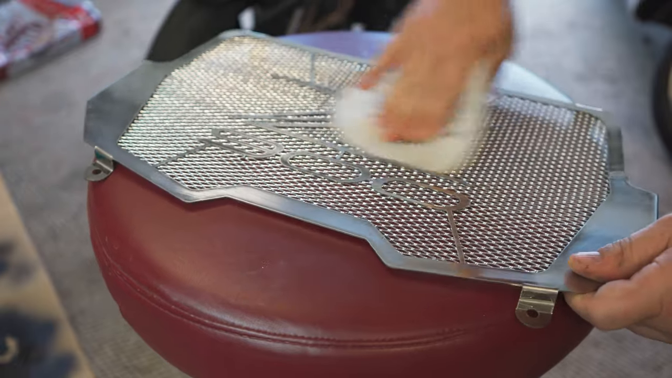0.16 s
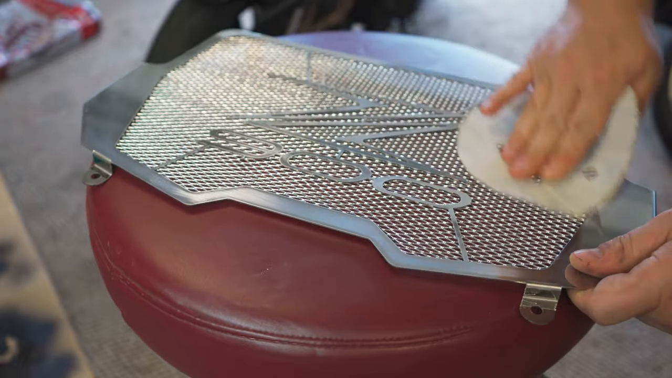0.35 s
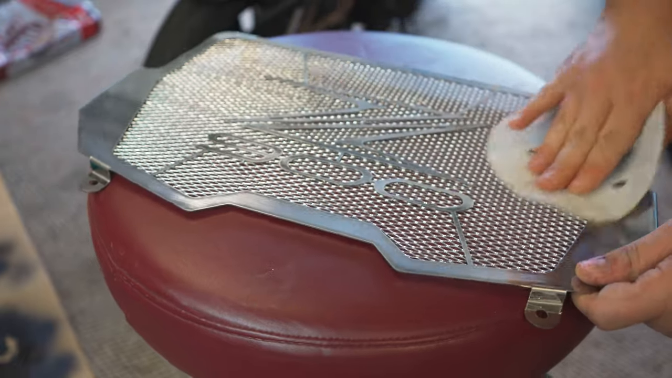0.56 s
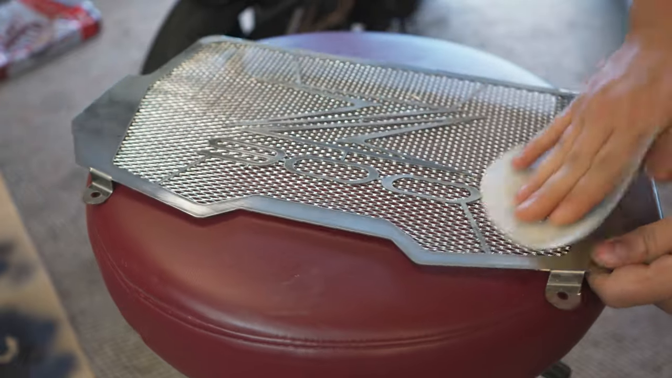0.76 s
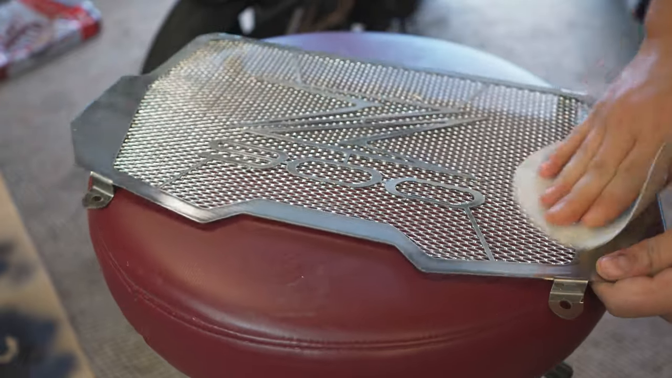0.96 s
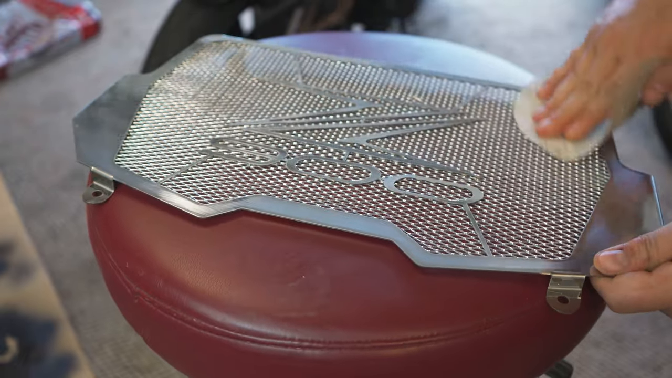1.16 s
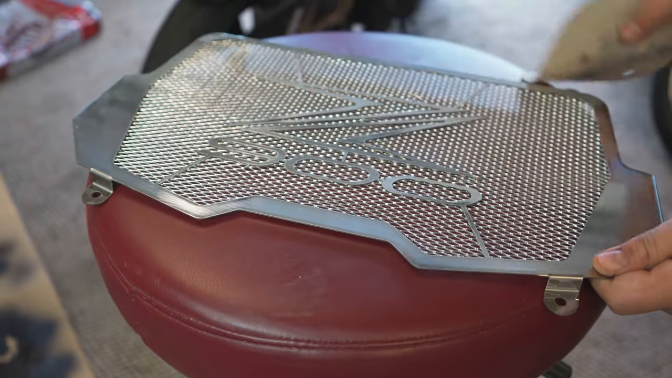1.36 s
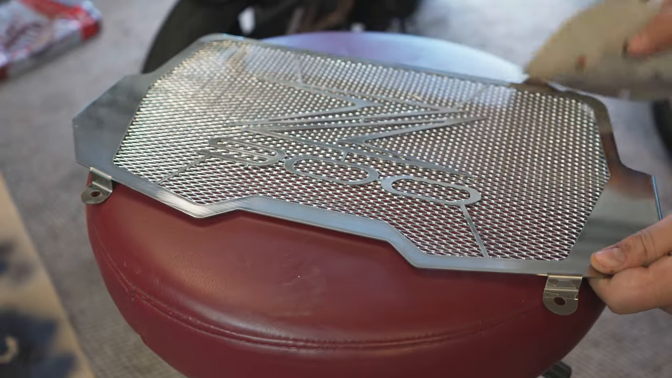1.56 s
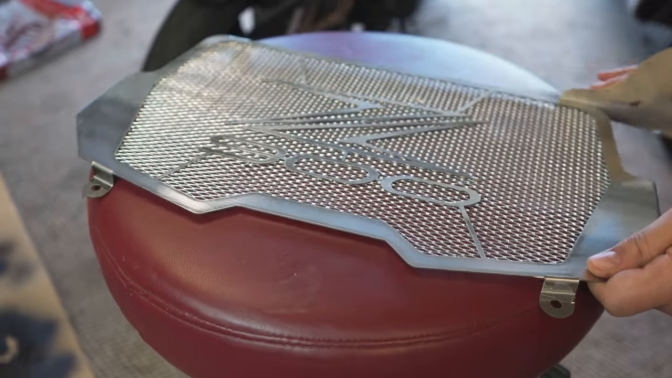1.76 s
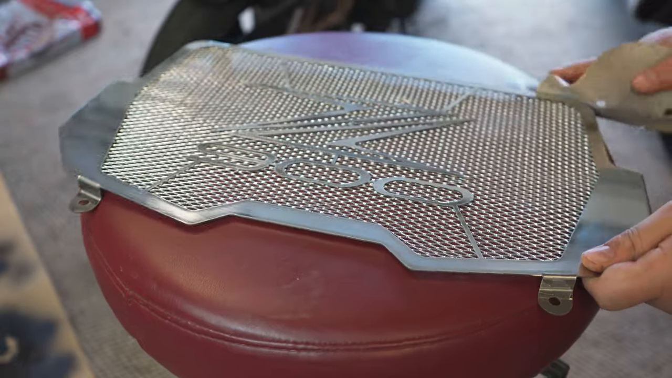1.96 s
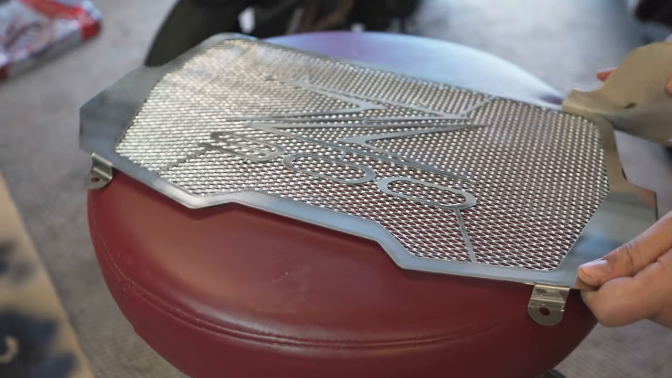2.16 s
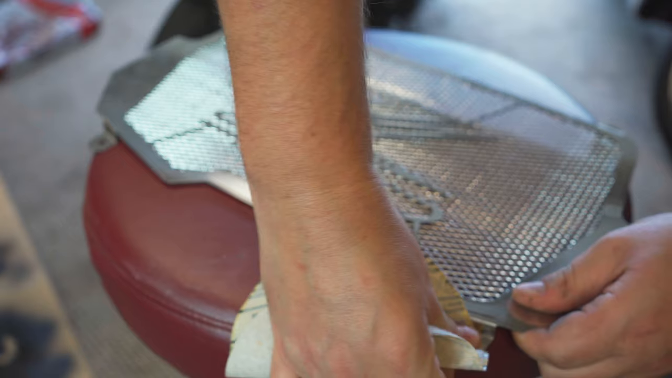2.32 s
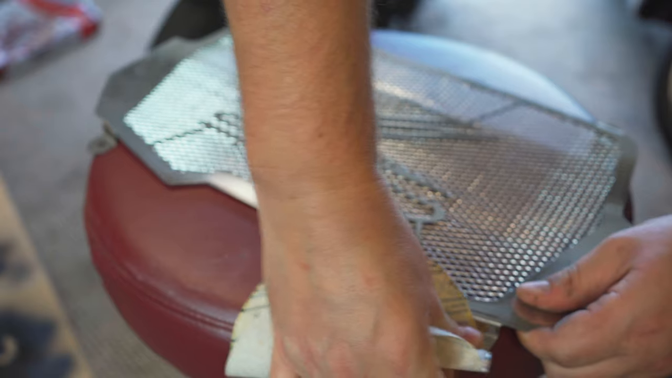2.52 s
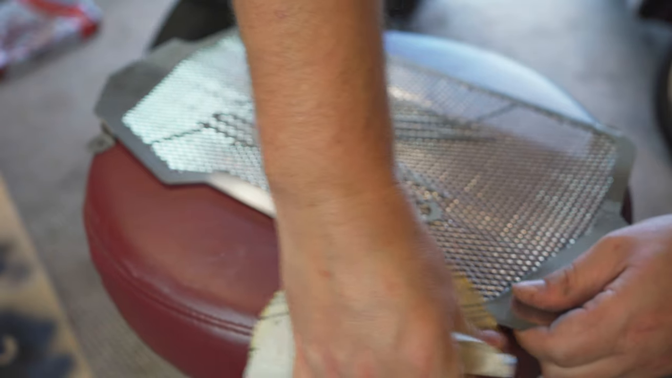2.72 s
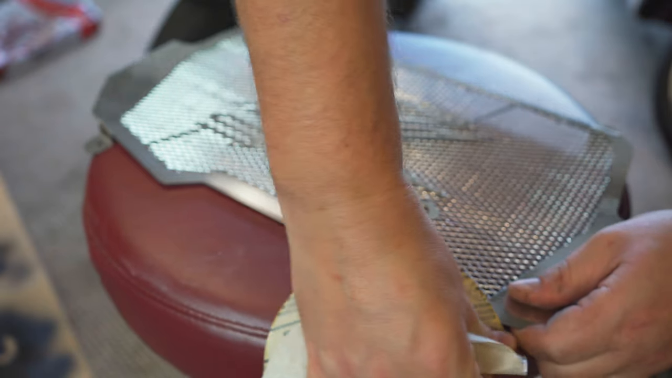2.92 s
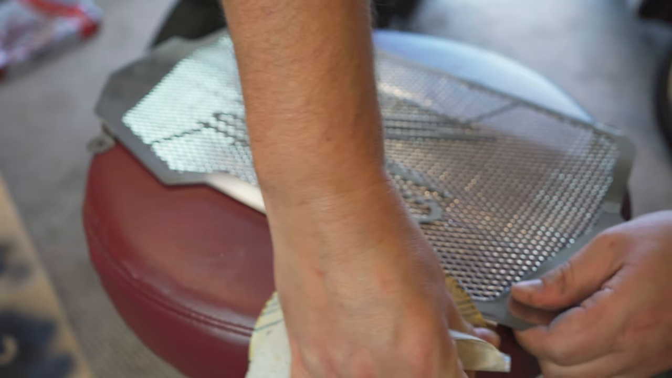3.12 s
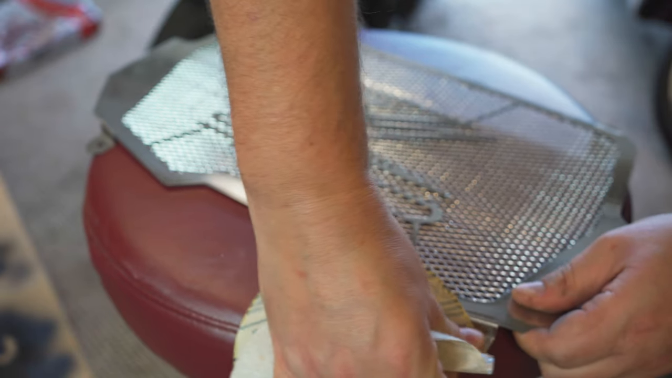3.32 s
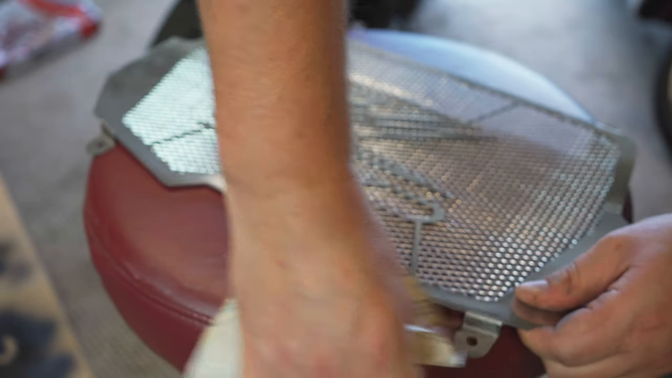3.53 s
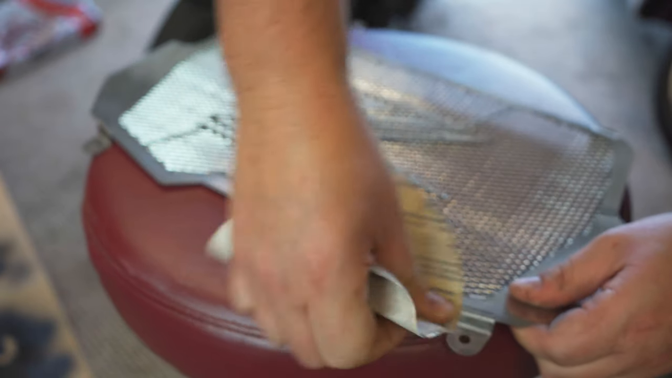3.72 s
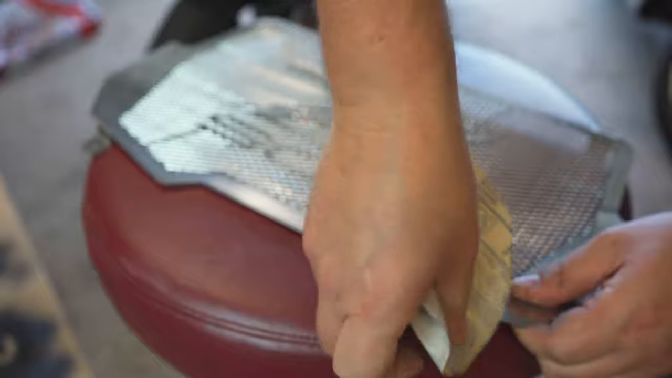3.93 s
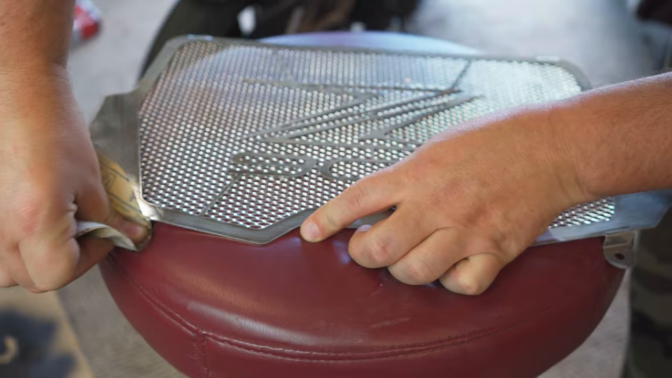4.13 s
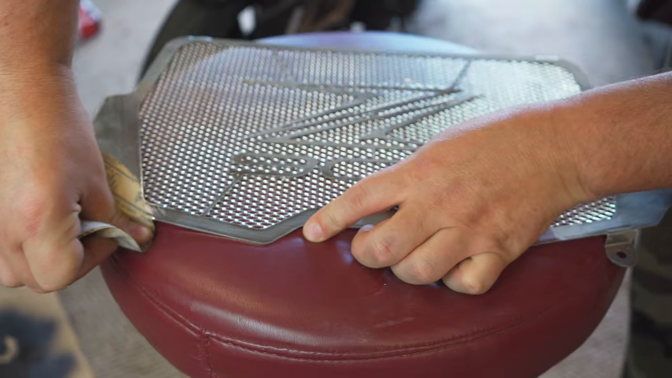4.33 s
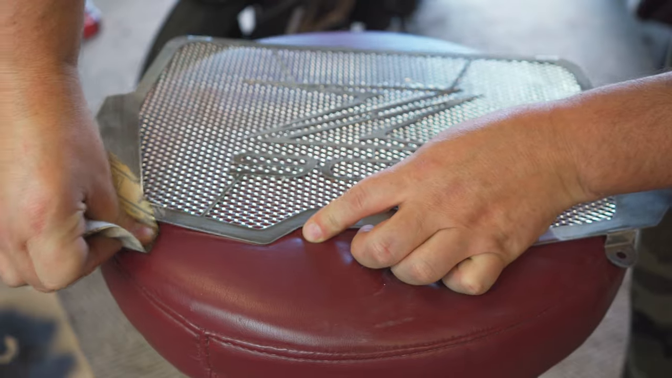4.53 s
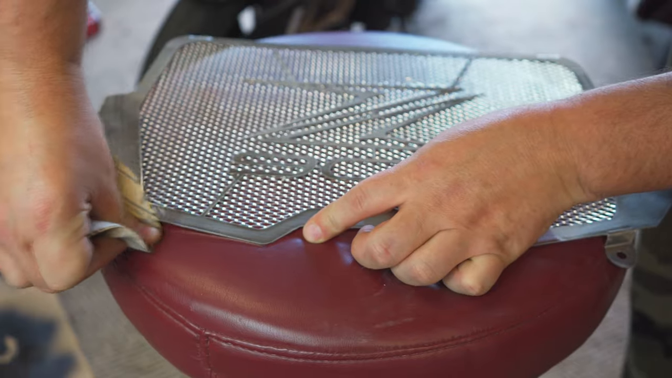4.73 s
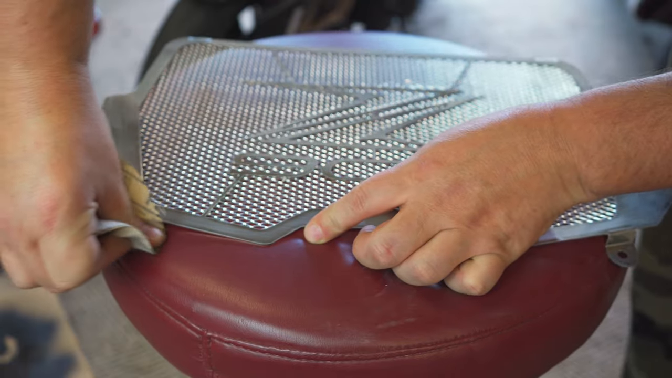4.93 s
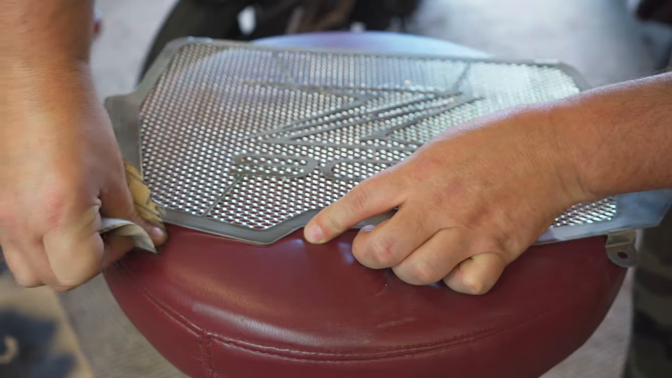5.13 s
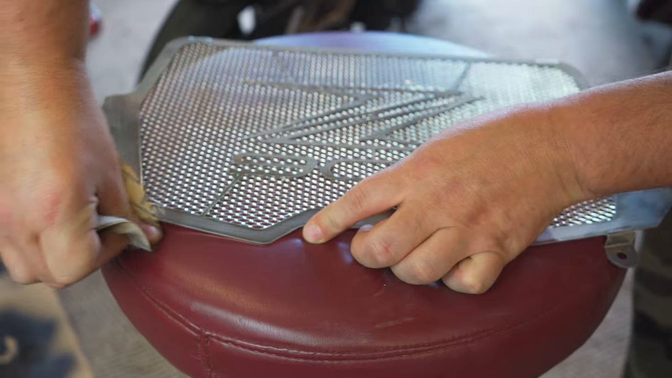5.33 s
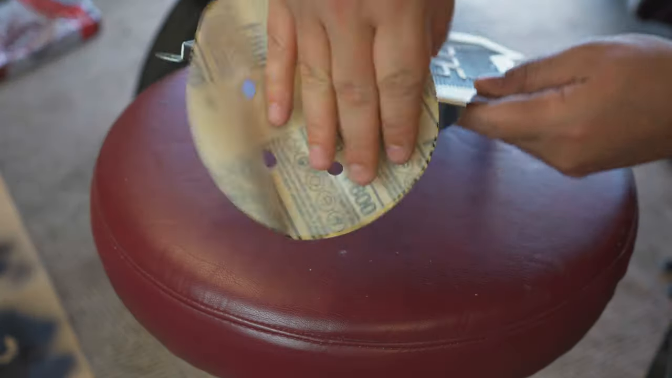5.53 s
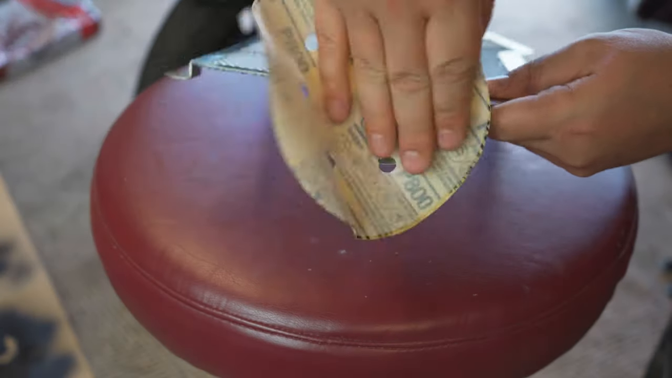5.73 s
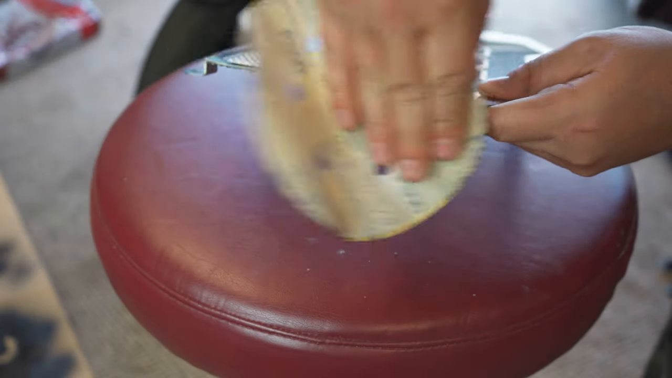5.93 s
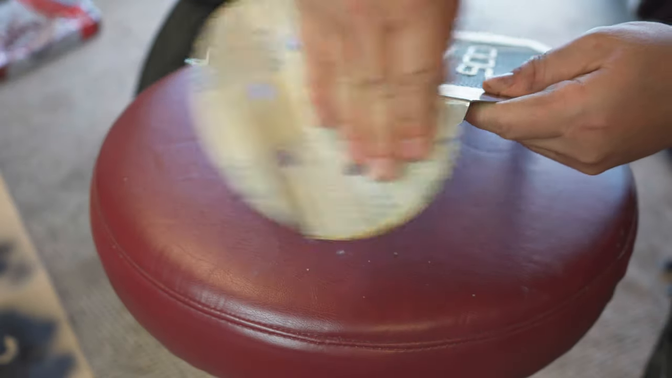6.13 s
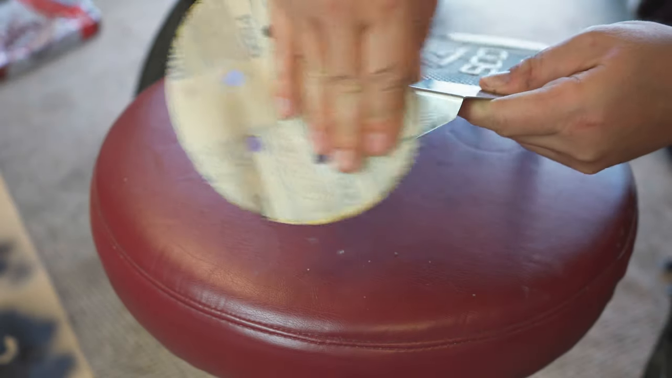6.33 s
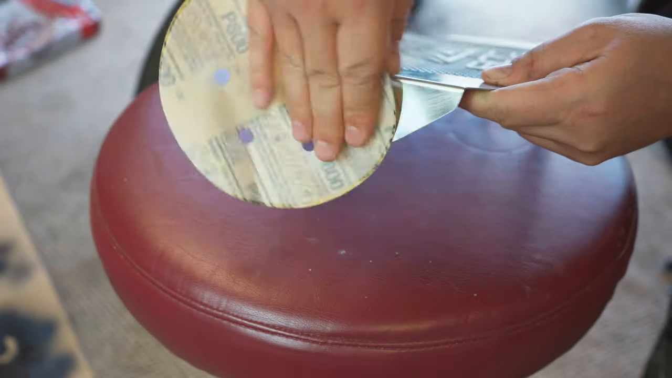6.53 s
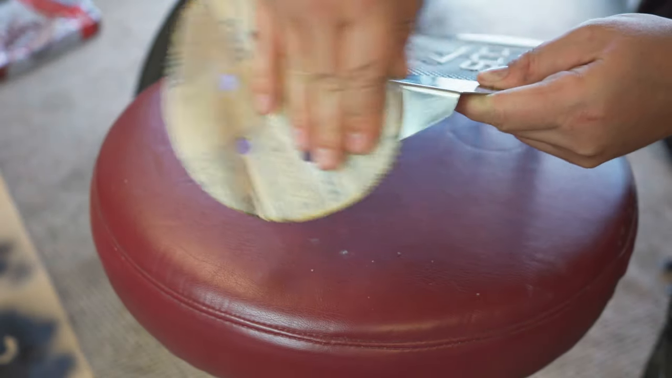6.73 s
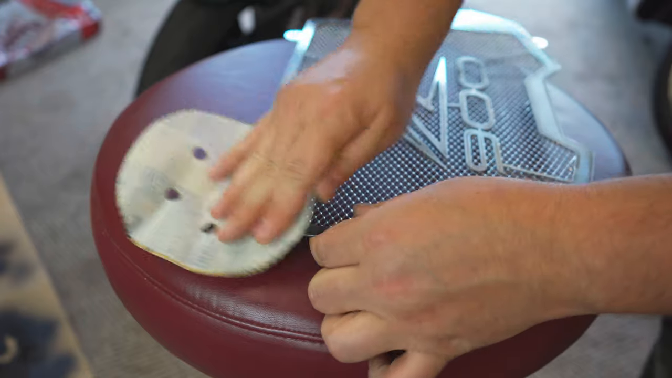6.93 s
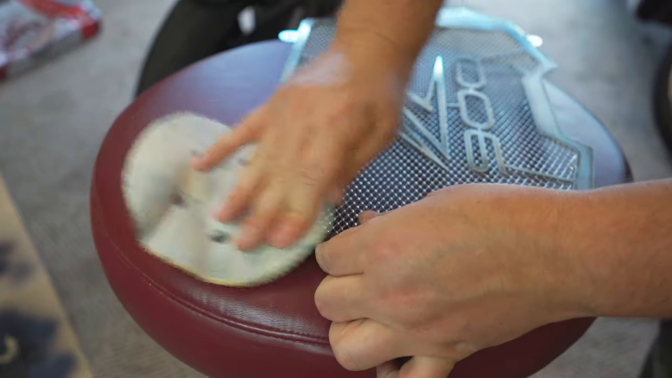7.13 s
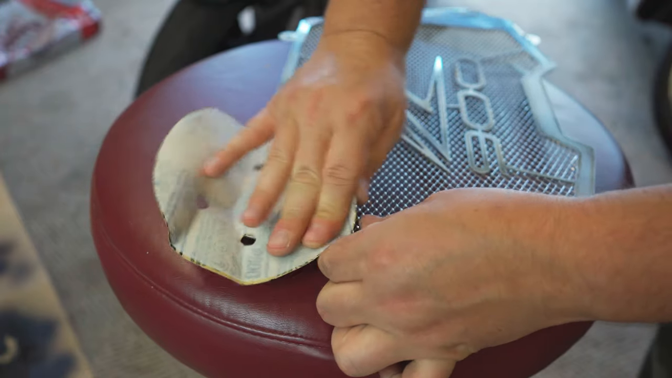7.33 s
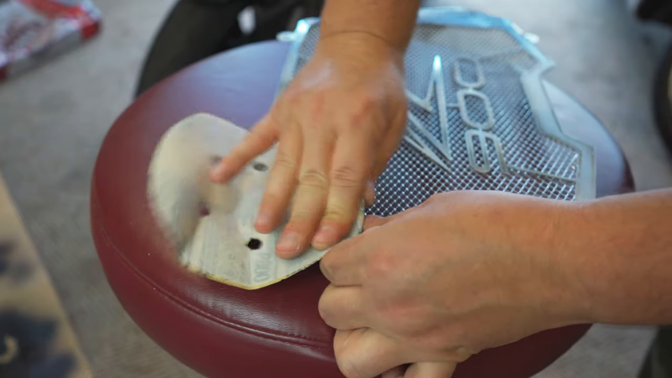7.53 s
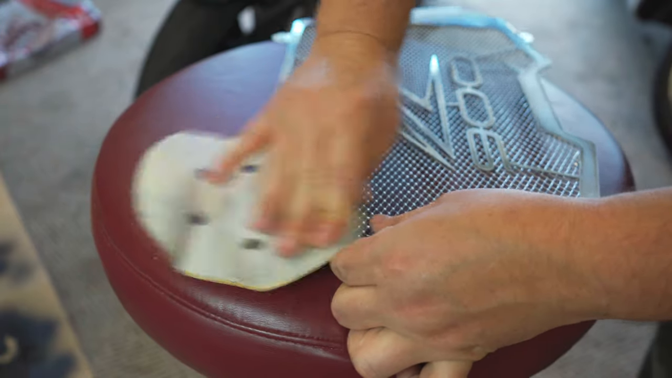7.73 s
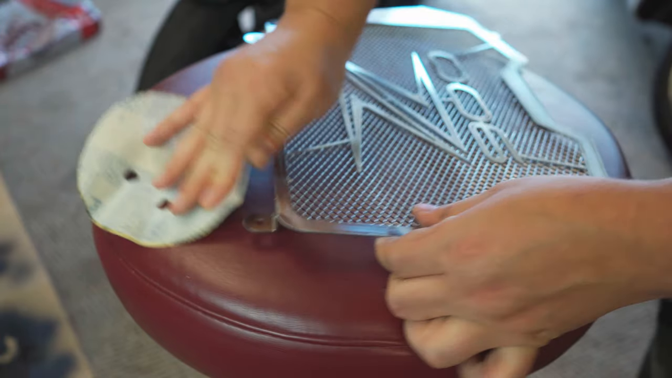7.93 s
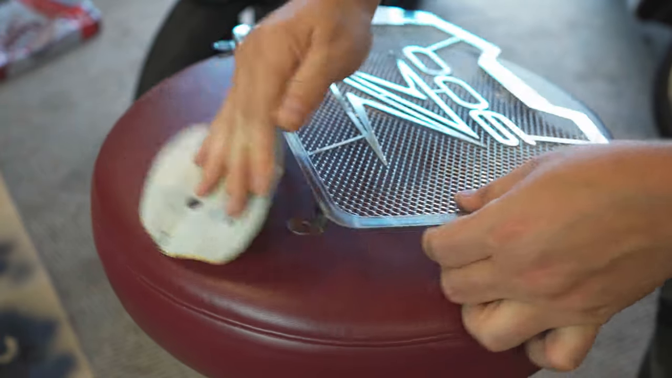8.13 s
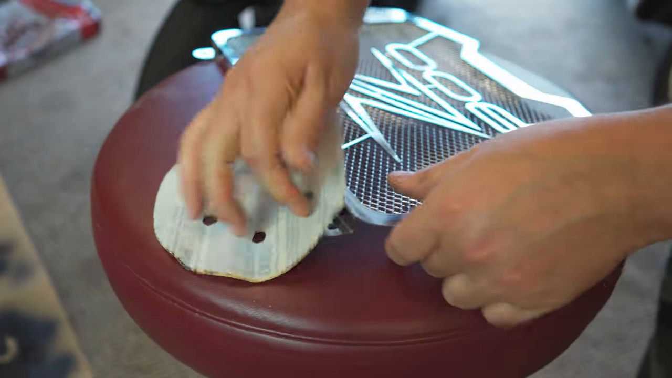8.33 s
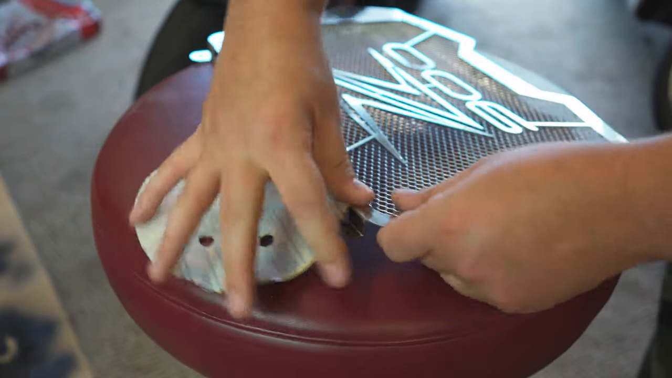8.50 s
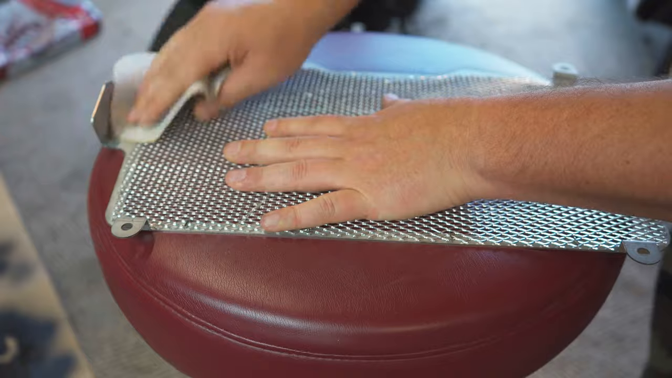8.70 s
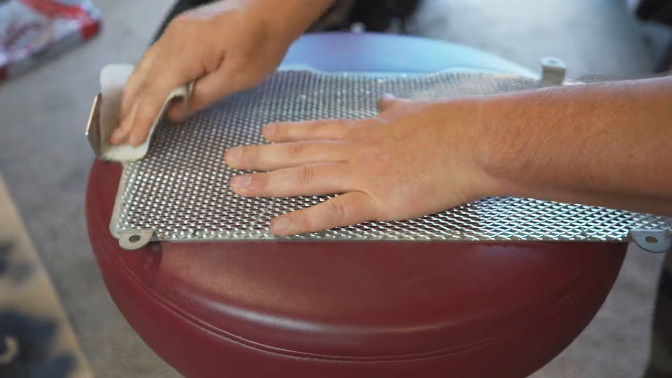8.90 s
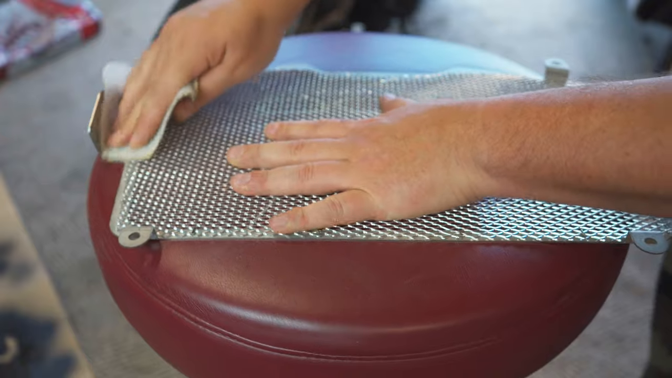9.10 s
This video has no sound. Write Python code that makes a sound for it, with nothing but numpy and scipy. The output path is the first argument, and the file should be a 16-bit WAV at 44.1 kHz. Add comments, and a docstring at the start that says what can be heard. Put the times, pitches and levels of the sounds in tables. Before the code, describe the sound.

A sandpaper disc is rubbed by hand over a perforated steel sheet on a padded stool. Broad hissy scuffs come first, then sparser handling, then fast, even, scratchy strokes in several bouts, each with its own tone. Ticks, dull knocks and soft cushion thuds mark the shifts, and tiny squeaks come near the end. Close stereo pickup in a workshop with a short reverberation and a faint low rumble.

```python
"""In a workshop, a sanding disc is rubbed by hand, in quick strokes, over a steel mesh grille on a padded stool.
Strokes, and faint rustles as the disc lifts off or is handled, are noise with snaps of single grains,
coloured by each grip, plus rim chatter and a flexing sheet. Decaying noise bursts make ticks, dull knocks and
bright crackles; low noise swells make the shoves into the cushion; gliding sines make late squeaks.
A diffuse tail answers the work, over filtered noises: low rumble, deep drone, soft air, thin steady high hiss."""
import sys
import numpy as np
from scipy import signal
from scipy.fft import rfft, irfft, next_fast_len
from scipy.io import wavfile
from scipy.ndimage import uniform_filter1d, map_coordinates

SR = 44100
rng = np.random.default_rng(int(sys.argv[2]) if len(sys.argv) > 2 else 0)


def generate_wav(signal):
    """Clip the signal to [-1, 1] and save it as 16-bit WAV at the path in sys.argv[1]."""
    frames = np.transpose(np.atleast_2d(signal))
    scaled = np.clip(frames, -1, 1) * 32767
    pcm = np.round(scaled).astype(np.int16)
    wavfile.write(sys.argv[1], SR, pcm)


N = 403956  # length in samples

# Share of a stroke or rustle after which it surges most
AT_ONCE, EARLY, MID, LATE = 0.12, 0.16, 0.48, 0.79

# Spectral shape of the rasp for each way of holding the work: f/Hz, relative density/dB
FLAT_ON_MESH = [(820, -34), (1400, -10.5), (1930, -2.5), (3040, -4.5), (3530, -2), (8820, 0.5), (12400, -5),
                (14400, -4.5), (15500, -9)]
FAR_CORNER = [(820, -40), (1400, -7), (1660, -3), (1800, -2), (4830, -3), (7000, -9), (9370, -10.5),
              (15500, -19)]
NEAR_RIM = [(820, -49), (1400, -11), (2070, -5.5), (3260, -1), (4190, -6), (4870, -4), (5730, -10),
            (9370, -11), (15500, -18.5)]
SIDE_TAB = [(820, -40), (1400, -8.5), (1860, -4), (2220, -8), (2720, -4.5), (3680, -7.5), (4190, -2.5),
            (4920, -7.5), (5390, -3.5), (9370, -13), (15500, -17)]
UPRIGHT_EDGE = [(820, -26.5), (1400, -9), (1870, -1.5), (2890, -1), (3460, -2), (3790, -2.5), (7220, -3),
                (11300, -5), (15500, -9.5)]
END_RIM = [(820, -31), (1400, -18), (1580, -8.5), (2390, -8.5), (2690, -12), (3160, -0.5), (3790, -8.5),
           (5070, -3), (7000, -5.5), (12500, -7.5), (15500, -11.5)]
BRACKET = [(820, -42), (1400, -10), (2430, 0.5), (3640, -3.5), (4190, 1), (4780, -3.5), (8480, -8),
           (10900, -12), (15500, -14.5)]

# Spectral shape of the low rumble, also of the cushion's swells: f/Hz, relative density/dB
RUMBLE_COLOUR = [(25, -24), (50, -20), (70, -9), (97, 3), (112, -5), (130, 1.5), (175, -5.5), (220, -5.5),
                 (300, -15), (500, -34.5)]


def amp(db):
    """Level as the logarithm of amplitude: decibels to gain."""
    return 10 ** (np.asarray(db) / 20)


def unit(x):
    """Normalisation by mean power: x at rms 1."""
    return x / np.sqrt(np.mean(x ** 2) + 1e-20)


def along(points, hz):
    """Logarithmic frequency scale: interpolate (f/Hz, value) points along it."""
    f, v = np.transpose(points)
    return np.interp(np.log(hz + 1), np.log(f + 1), v)


def wobble(rate, size):
    """Band-limited random modulation: a smooth curve through rate random knots a second."""
    knots = rng.standard_normal(int(size * rate / SR) + 4)
    return map_coordinates(knots, [np.arange(size) * rate / SR], mode="nearest")


def filtered(x, response):
    """Linear filtering: the spectrum of x times a complex response of frequency."""
    n = x.shape[-1]
    m = next_fast_len(n + 4096)
    return irfft(rfft(x, m) * response(np.fft.rfftfreq(m, 1 / SR)), m)[..., :n]


def add(track, s, sound):
    """Superposition: mix a sound into the track from time s."""
    at = round(s * SR)
    part = sound[:, max(-at, 0):max(N - at, 0)]
    start = max(at, 0)
    track[:, start:start + part.shape[1]] += part


def spread(pair, colour):
    """Interchannel coherence: two unrelated signals become a coloured left and right, near mono in the bass."""
    # Coherence of the two channels: f/Hz, left-right likeness (1 = identical)
    likeness = [(200, 1), (600, 0.93), (1200, 0.81), (2500, 0.68), (5000, 0.48), (12000, 0.2)]

    def mid_side(hz):
        turn = np.arccos(np.clip(along(likeness, hz), -1, 1)) / 2
        return amp(along(colour, hz)) * [np.cos(turn), np.sin(turn)]

    mid, side = filtered(pair, mid_side)
    return np.array([mid + side, mid - side])


def placed(x, pan_db, lag):
    """Interaural cues: an off-centre source differs in arrival time and, mainly in the treble, in level."""
    # How far the level difference acts: f/Hz, share of the level difference
    shadow = [(200, .05), (700, .3), (2000, 0.59), (3000, 0.97), (5000, 0.49), (9000, 1.28), (15000, 0.88)]
    sides = np.array([[1], [-1]]) / 2

    def response(hz):
        level = amp(sides * pan_db * along(shadow, hz))
        delay = np.exp(-2j * np.pi * hz * sides * lag / SR)
        return level * delay

    return filtered(x, response)


def background(air_db=-57.0, whine_db=-58.5, rumble_db=1.5, drone_db=2.5, uneven_db=1.1):
    """Stationary filtered noise: soft air and a thin high hiss, over a rumble and drone that swell and sink."""
    # Level of the low rumble, before its offset: t/s, relative level/dB
    rumble_course = [(0.0, -54.5), (1.17, -62.5), (2.32, -56), (8.57, -57), (8.88, -52), (9.16, -55)]
    # Level of the deep drone, before its offset: t/s, relative level/dB
    drone_course = [(0.0, -69), (0.25, -74), (5.38, -61.5), (5.84, -72), (7.88, -61), (8.21, -71),
                    (9.16, -61)]
    # Spectral shape of the deep drone: f/Hz, relative density/dB
    drone_colour = [(35, -50), (48, -27), (55, 8.5), (62, -5), (85, -44.5)]
    # Spectral shape of the air noise: f/Hz, relative density/dB
    air_colour = [(150, -6), (220, -1), (450, 5.5), (1000, -2), (2000, -3), (4000, -10), (8000, -21),
                  (12000, -18), (16000, -31)]
    # Spectral shape of the thin high hiss: f/Hz, relative density/dB
    whine_colour = [(7800, -38), (8400, -13), (8900, -3), (9900, -8), (10300, -16), (11000, -38)]

    def wide(colour):
        return unit(spread(rng.standard_normal((2, N)), colour))

    def mono(colour):
        return unit(filtered(rng.standard_normal(N), lambda hz: amp(along(colour, hz))))

    def level(rows):
        return np.interp(np.arange(N) / SR, *np.transpose(rows))

    rumble_level = level(rumble_course) + rumble_db + uneven_db * wobble(9, N)
    rumble = amp(rumble_level) * mono(RUMBLE_COLOUR)
    drone = amp(level(drone_course) + drone_db) * mono(drone_colour)
    air = amp(air_db) * wide(air_colour)
    whine = amp(whine_db) * wide(whine_colour)
    return rumble + drone + air + whine


def thumps(length_s=0.11):
    """Low-frequency response of a soft support: the padded stool answers each shove with a low swell."""
    # The grille is shoved into the cushion: t/s (middle of the swell), level/dB
    shoves = [(0.01, -53), (0.25, -49), (3.655, -43.5), (4.97, -51), (5.11, -52), (5.21, -45.5),
              (5.59, -48.5), (8.29, -51), (8.75, -52), (8.95, -49)]
    track, size = np.zeros((2, N)), int(length_s * SR)
    for s, db in shoves:
        boom = unit(spread(rng.standard_normal((2, size)), RUMBLE_COLOUR))
        add(track, s - length_s / 2, amp(db) * np.hanning(size) * boom)
    return track


def grip_at(s):
    """Excitation point sets the timbre: colour, place and balance of the sound at time s."""
    # Grips in order: colour as (f/Hz, relative density/dB), left minus right level/dB, left lag/samples,
    # rim chatter f/Hz, chatter relative level/dB, sag where the hand turns/dB, surge where it presses/dB,
    # grit hiss relative level/dB, plate body reference level/dB
    grips = [(FLAT_ON_MESH, -6.3, 2.5, 3100, -17, 8.4, 2.2, 7.94, -49),
             (FAR_CORNER, -7.5, 2.6, 4600, -14, 4.8, 5.1, 0, -47),
             (NEAR_RIM, -5, 1, 3050, -1.6, 5.2, 4.65, 0.5, -50),
             (SIDE_TAB, 1, -2.13, 1850, -2.5, 8.1, 3, 1.16, -46.5),
             (UPRIGHT_EDGE, -2.8, .1, 2450, -10, 5.6, 6.9, 2.4, -50),
             (UPRIGHT_EDGE, -2.6, .1, 2700, -11, 2.6, 5.1, 4.4, -47.5),
             (END_RIM, -1.4, 0.27, 2600, -2.2, 2.8, 2.3, 1.8, -50),
             (BRACKET, -0.69, 0.51, 4150, -6, 6.2, 7.4, 4.1, -46.5)]
    # The hand takes the next grip: t/s
    grip_starts = [1.6, 2.42, 3.9, 5.54, 6.38, 6.97, 8.2]
    return grips[np.searchsorted(grip_starts, s)]


def grit(size, per_second=5000, grain_share=0.21):
    """Shot noise: countless tiny scratches, with the sharper snaps of single grains among them."""
    snaps = (rng.random(size) < per_second / SR).astype(float)
    power = 1 - grain_share + grain_share * unit(snaps) ** 2
    return rng.standard_normal((2, size)) * np.sqrt(power)


def shifting(x, patchy_db=3.0, smooth_above_hz=6500):
    """Modal damping: travelling fingers free and damp parts of the sheet, so resonances come and go."""
    hz, _, z = signal.stft(x, SR, nperseg=512)
    field = rng.standard_normal(z.shape[1:])
    field = uniform_filter1d(field, size=3, axis=0)  # across frequency
    field = unit(uniform_filter1d(field, size=5, axis=1))  # across time
    depth_db = patchy_db / np.sqrt(1 + (hz[:, None] / smooth_above_hz) ** 2)
    return signal.istft(z * amp(depth_db * field), SR, nperseg=512)[1][:, :x.shape[1]]


def chatter(centre_hz, size, width_hz=230, wander=.055):
    """Stick-slip friction on the rim: a narrow, scratchy band whose pitch wanders with the fingers."""
    pitch_hz = centre_hz * (1 + wander * wobble(29.86, size))
    band = filtered(rng.standard_normal((2, size)), lambda hz: 1 / (1 + (hz / width_hz) ** 4))
    carrier = np.sin(2 * np.pi * np.cumsum(pitch_hz) / SR)
    return unit(spread(band * carrier, [(centre_hz, 0)]))  # a flat colour


def stroke(row, rise_db_s=2200, fall_db_s=600, surge_width=0.18, hold=0.39, squeal_db=3,
           top_hz=11000, top_db=5, top_speed=0.86, judder_hz=260, judder_db=0.8, drift_db=0.63,
           speed_db=3, body_follow=0.54, body_from_db=-35, bite_db=-30, bite=0.98):
    """Sliding friction: speed makes the rasp louder and brighter mid-way; pressure adds one surge."""
    # Modal shape of the whole sheet flexing: f/Hz, relative density/dB
    plate_colour = [(130, -30), (210, 1), (280, -8), (340, 1), (450, -2.5), (600, -1.5), (800, 0.5),
                    (1050, 3), (1300, -0.5), (1700, -3), (3000, -50)]
    start, length, db, hardest = row
    colour, pan_db, lag, chatter_hz, chatter_db, sag_db, surge_db, hiss_db, body_db = grip_at(start)
    t = np.arange(-SR // 50, int(length * SR) + SR // 10) / SR
    way = np.clip(t / length, 0, 1)
    speed = np.sin(np.pi * way)
    press = np.exp(-((way - hardest) / surge_width) ** 2)
    # pressing holds back part of the sag
    force_db = db + sag_db * (speed - 1) * (1 - hold * press) + surge_db * press
    force_db = force_db - rise_db_s * np.maximum(-t, 0) - fall_db_s * np.maximum(t - length, 0)
    # the paper catches and slips unevenly on the holes of the mesh
    force_db = force_db + judder_db * wobble(judder_hz, len(t)) + drift_db * wobble(62.5, len(t))

    steel = spread(shifting(grit(len(t))), colour)
    rasp = filtered(steel, lambda hz: 1 / (1 + (hz / 5000) ** 10))
    hiss = unit(steel - rasp) * amp(hiss_db + speed_db * (speed - 1))
    # the top of the hiss gets an extra level change, weaker at both ends of a stroke
    dull = filtered(hiss, lambda hz: 1 / (1 + (hz / top_hz) ** 10))
    hiss = dull + (hiss - dull) * amp(top_db * (speed - top_speed))
    # the harder the grit bites, the more the rim chatters
    screech_db = chatter_db + squeal_db * (press - 1) + bite * (force_db - bite_db)
    screech = chatter(chatter_hz, len(t)) * amp(screech_db)
    # the flexing sheet grows more slowly than the rasp
    body = unit(spread(shifting(grit(len(t))), plate_colour))
    body = body * amp(body_db + body_follow * (force_db - body_from_db))
    contact = amp(force_db) * (unit(rasp) + hiss + screech)
    return start + t[0], placed(contact + body, pan_db, lag)


def sanding():
    """Superposition of friction sounds: strokes of the disc, with faint rustles as it lifts off or is handled."""
    # Strokes and faint rustles: start t/s, length/s, relative level/dB, share after which each surges most
    passes = [(-0.02, 0.15, -36.5, EARLY), (0.163, 0.078, -34.5, MID), (0.221, 0.13, -35, EARLY),
              (0.357, 0.18, -35, EARLY), (0.566, 0.14, -34.5, EARLY), (0.72, .147, -36, EARLY),
              (0.839, .083, -36.5, EARLY), (0.947, .26, -34.5, EARLY), (1.136, 0.28, -36.5, EARLY),
              (1.383, 0.052, -40.5, EARLY), (1.423, 0.087, -55.5, EARLY), (1.647, 0.045, -53, EARLY),
              (1.697, 0.14, -35, MID), (1.848, .14, -44.5, MID), (2.019, 0.048, -44, MID),
              (2.074, 0.12, -57, LATE), (2.188, 0.062, -41, MID), (2.242, 0.086, -39.5, EARLY),
              (2.333, 0.071, -43, MID), (2.438, 0.081, -35, LATE), (2.548, 0.082, -34.5, AT_ONCE),
              (2.676, .087, -34, LATE), (2.79, 0.079, -31.5, AT_ONCE), (2.92, 0.087, -35.5, LATE),
              (3.04, 0.079, -34, EARLY), (3.15, 0.11, -47, MID), (3.285, 0.088, -43, MID),
              (3.399, 0.12, -41.5, MID), (3.532, 0.12, -38, MID), (3.646, .108, -58.5, EARLY),
              (3.923, .048, -45, MID), (3.964, 0.081, -51.5, LATE), (4.054, .052, -59, EARLY),
              (4.124, .042, -53.5, EARLY), (4.181, 0.068, -45, EARLY), (4.303, 0.063, -41.5, EARLY),
              (4.377, 0.084, -43, MID), (4.506, 0.071, -41, EARLY), (4.592, 0.093, -41, MID),
              (4.703, 0.073, -38, MID), (4.78, 0.11, -43, MID), (4.922, 0.082, -41.5, MID),
              (5.015, 0.088, -41, EARLY), (5.138, .087, -41, MID), (5.233, 0.081, -41, EARLY),
              (5.354, 0.089, -43, MID), (5.455, 0.042, -45, LATE), (5.579, 0.068, -43.5, EARLY),
              (5.677, .117, -32, LATE), (5.816, 0.087, -33.5, AT_ONCE), (5.936, 0.093, -33.5, LATE),
              (6.057, 0.085, -33, EARLY), (6.161, .096, -33, LATE), (6.278, .083, -34, EARLY),
              (6.386, 0.098, -38, LATE), (6.506, 0.098, -37, EARLY), (6.626, .09, -35, AT_ONCE),
              (6.738, 0.082, -38, EARLY), (6.849, .112, -39, EARLY), (6.985, 0.069, -34, EARLY),
              (7.085, 0.062, -37, LATE), (7.183, 0.087, -35.5, MID), (7.297, 0.094, -41.5, EARLY),
              (7.415, 0.084, -41, EARLY), (7.531, 0.094, -41, EARLY), (7.651, 0.093, -40.5, LATE),
              (7.771, 0.067, -39, AT_ONCE), (7.862, .12, -38.5, LATE), (7.972, .075, -53, EARLY),
              (8.17, 0.085, -59, LATE), (8.262, 0.021, -44.5, EARLY), (8.283, 0.12, -55, EARLY),
              (8.379, .072, -48, EARLY), (8.462, 0.013, -45, MID), (8.472, 0.12, -54.5, EARLY),
              (8.638, 0.028, -46.5, EARLY), (8.683, 0.015, -46.5, LATE), (8.717, 0.15, -37.5, EARLY),
              (8.935, 0.13, -42, LATE), (9.109, .078, -45.5, MID)]
    track = np.zeros((2, N))
    for row in passes:
        add(track, *stroke(row))
    return track


def ticks_and_knocks(tick_db=-8, knock_db=9.5, tick_t60=0.015, knock_t60=0.016, ring_db=-11, ring_t60=0.16):
    """Damped ringing after an impulse: each event is a dry tick and a dull knock at once."""
    # Ticks and dull knocks; the one near 4.06 s is a bare click:
    # t/s, tick relative level/dB, knock relative level/dB
    blows = [(0.8376, -36, -43), (1.645, -21, -44.5), (2.3254, -15, -47.5), (3.6167, -22, -38),
             (3.929, -27, -57), (4.0563, -20, -56), (4.7355, -34, -40.5), (4.967, -33, -38),
             (5.1896, -29, -37.5), (5.5644, -17, -38), (5.6155, -20, -36.5), (5.6643, -40, -43.5),
             (6.5139, -18, -32.5), (6.7423, -15, -36), (7.1828, -34, -40.5), (7.3802, -21, -42.5),
             (7.5971, -17, -40), (7.8181, -16, -41), (7.9652, -29, -44), (8.2631, -34, -44.5),
             (8.4236, -29, -55), (8.498, -34, -48), (8.7811, -32, -44)]
    # Spectral shape of the tick: f/Hz, relative density/dB
    tick_colour = [(500, -45), (1200, -18), (1750, 4.5), (2600, 2.5), (4000, 6.5), (9000, -5), (16000, -13)]
    # Spectral shape of the knock: f/Hz, relative density/dB
    knock_colour = [(60, -36), (200, -1.5), (380, 3), (700, -4.5), (1100, 1), (1700, -3.5), (3000, -5),
                    (8000, -44)]
    track, t = np.zeros((2, N)), np.arange(SR // 5) / SR

    def burst(colour, t60):
        decay = amp(-60 * t / t60) + amp(ring_db - 60 * t / ring_t60)
        return unit(spread(rng.standard_normal((2, len(t))), colour)) * decay

    for s, db, thud_db in blows:
        pan_db, lag = grip_at(s)[1:3]
        tick = amp(db + tick_db) * burst(tick_colour, tick_t60)
        knock = amp(thud_db + knock_db) * burst(knock_colour, knock_t60)
        add(track, s, placed(tick + knock, pan_db, lag))
    return track


def crackles(t60=0.078):
    """Exponential decay of a noise impulse: short bright crackles."""
    # Short bright crackles: t/s, initial level/dB
    bursts = [(1.394, -27), (1.419, -27), (3.612, -24), (4.0556, -36), (6.748, -25)]
    # Spectral shape of the crackle: f/Hz, relative density/dB
    crackle_colour = [(3000, -32), (6000, 1), (10000, 2), (13000, 3), (16000, -10)]
    track, t = np.zeros((2, N)), np.arange(SR // 10) / SR
    for s, db in bursts:
        crackle = unit(spread(grit(len(t)), crackle_colour)) * amp(db - 60 * t / t60)
        add(track, s, placed(crackle, *grip_at(s)[1:3]))
    return track


def squeaks(waver=0.025):
    """Stick-slip oscillation: the paper's edge sticks and slips fast enough to give a short, falling chirp."""
    # Squeaks: start t/s, length/s, first f/Hz, last f/Hz, level midway between the two channels/dB
    chirps = [(8.384, 0.029, 4360, 3660, -36), (8.716, 0.04, 4420, 4400, -43),
              (8.755, 0.034, 4280, 3820, -45)]
    track = np.zeros((2, N))
    for s, length, from_hz, to_hz, db in chirps:
        size = int(length * SR)
        hz = np.linspace(from_hz, to_hz, size) * (1 + waver * wobble(430, size))
        tone = np.sin(2 * np.pi * np.cumsum(hz) / SR)
        add(track, s, amp(db) * np.hanning(size) * tone * amp([[-3], [3]]))  # louder on the right
    return track


def room(x):
    """Diffuse reverberation: a short answer of the workshop, different at each side."""
    # Reverberation time: f/Hz, t60/s
    decay_times = [(200, 0.39), (3000, 0.25), (7000, 0.58), (13000, 0.26)]
    hz, t, z = signal.stft(rng.standard_normal((2, SR // 2)), SR, nperseg=256)
    decay = amp(-60 * t / along(decay_times, hz)[:, None])
    tail = signal.istft(z * decay, SR, nperseg=256)[1]
    tail = np.pad(tail / np.linalg.norm(tail[0]), ((0, 0), (SR // 200, 0)))  # 5 ms of delay ahead
    return signal.fftconvolve(x, tail, axes=1)[:, :N]


def scene():
    """Direct and reverberant sound: the work close up, in its room, over the background."""
    work = amp(-1.09) * sanding() + amp(-2) * ticks_and_knocks() + crackles() + squeaks()
    return work + amp(-15.0) * room(work) + thumps() + background()


def record(dry, top_hz=15950):
    """Band limitation: nothing above the top frequency passes."""
    return filtered(dry, lambda hz: hz < top_hz)


dry = scene()
out = record(dry)
generate_wav(out)
```